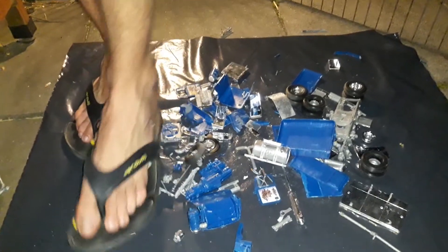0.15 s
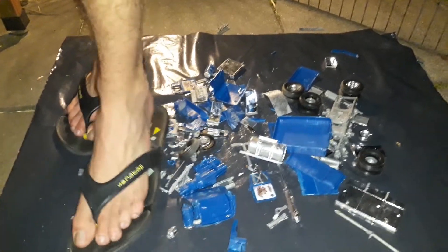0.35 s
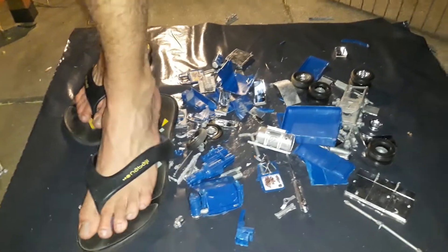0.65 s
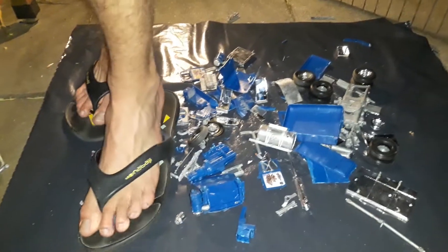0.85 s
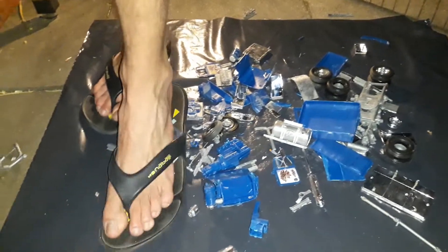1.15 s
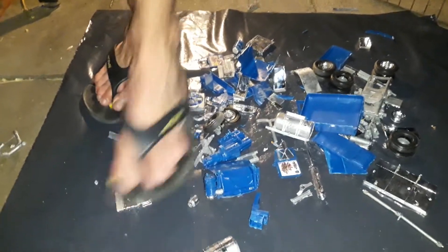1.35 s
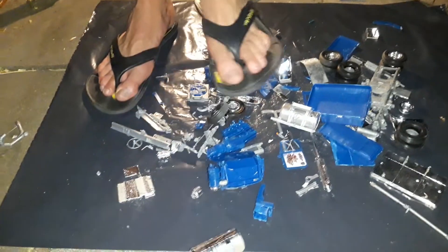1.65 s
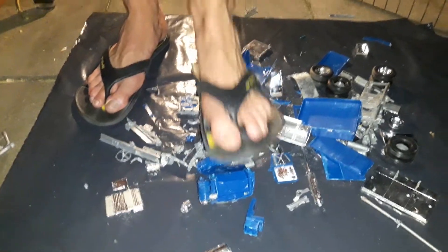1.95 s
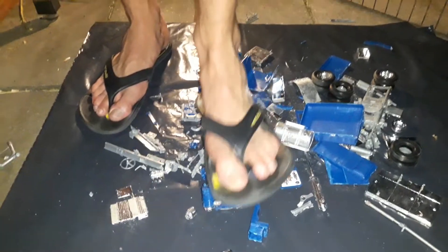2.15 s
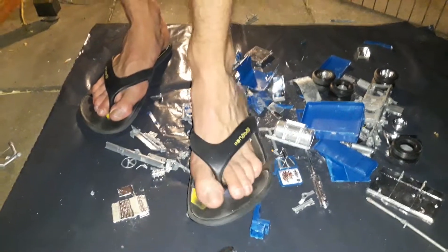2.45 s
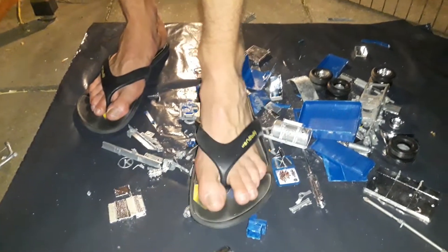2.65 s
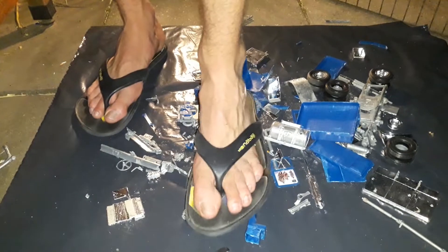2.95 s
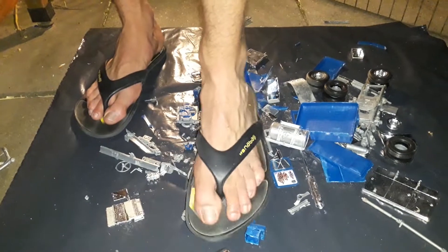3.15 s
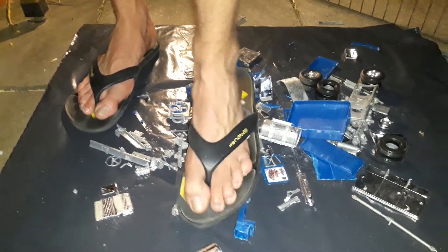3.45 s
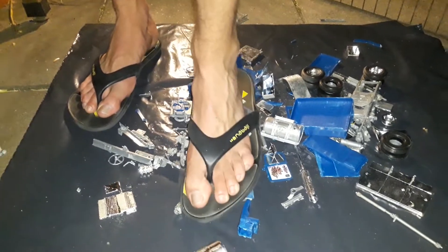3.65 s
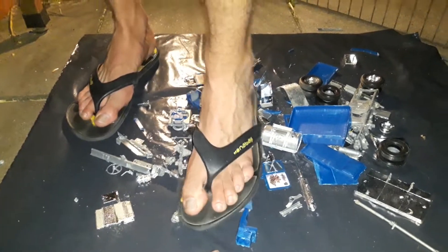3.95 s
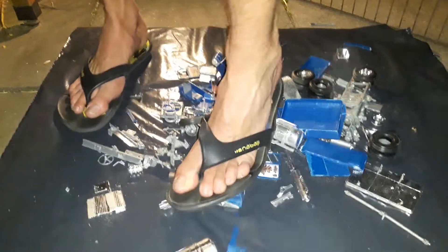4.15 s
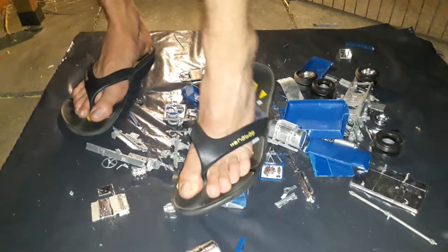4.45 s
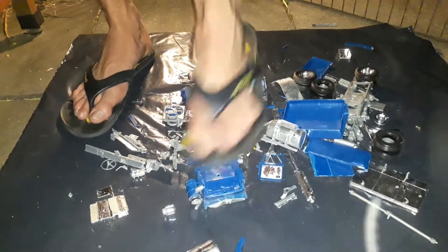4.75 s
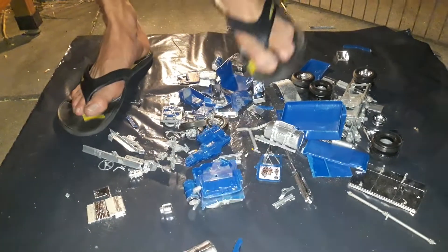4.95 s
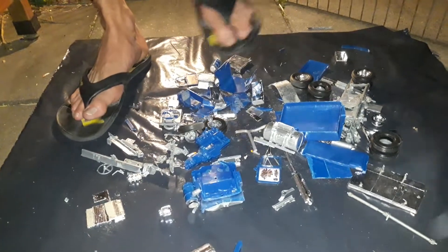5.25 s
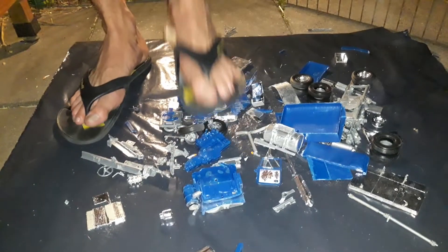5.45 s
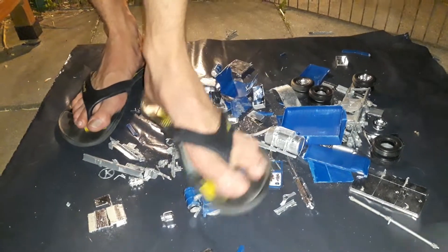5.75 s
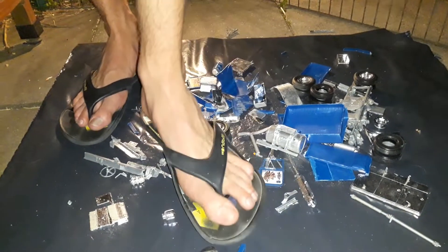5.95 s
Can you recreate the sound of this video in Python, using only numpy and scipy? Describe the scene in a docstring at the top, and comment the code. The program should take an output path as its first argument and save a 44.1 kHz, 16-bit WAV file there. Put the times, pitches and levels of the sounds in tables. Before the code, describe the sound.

At night outdoors, heard close to a sheet on paving. From 0 to 0.8 s, soft low bumps and small plastic ticks with faint scraping over a low rumble. At about 0.9 s a part gives way in a tight, loud, hollow crack with a dull rubber slap, echoing briefly off nearby walls. Near quiet follows until 2.3 s, when the sole drags bits, with light clicks. A snap at 2.7 and another at 3.0 lead to a dense volley of bright, brittle cracks from 3.2 to 3.45 s. Separate clicks follow, then hard crunches at 3.95 and 4.1 s with grinding grit. Between 4.2 and 4.7 s pieces tick, scrape and settle, with a small crack near 4.4. It is almost silent until soft bumps around 5.4; from 5.7 light taps and scraping build to a sharp bright clatter at 5.9 to 6.1 s, with a faint insect rasp behind.

```python
"""Outdoors at night, on a sheet laid over paving: a foot in a rubber sandal treads a plastic model kit to bits.
Parts snap in bursts of damped noise and ringing modes; loose bits tick as short clicks with a note.
Grains and uneven noise grind and drag under the sole, which slaps down; nearby walls throw the blows back.
Behind lie soft low sine bumps, and a rumble, a hiss and a faint bush cricket shaped from noise."""
import sys
import numpy as np
from scipy import signal
from scipy.io import wavfile

SR = 44100
rng = np.random.default_rng(int(sys.argv[2]) if len(sys.argv) > 2 else 0)


def generate_wav(signal):
    """Clip the signal to [-1, 1] and save it as 16-bit WAV at the path in sys.argv[1]."""
    frames = np.transpose(np.atleast_2d(signal))
    scaled = np.clip(frames, -1, 1) * 32767
    pcm = np.round(scaled).astype(np.int16)
    wavfile.write(sys.argv[1], SR, pcm)


N = 268569  # length in samples

SHARD_HZ = 4000  # pitch of a small shard, from which sizes are counted


def amp(db):
    """Decibels to gain."""
    return 10 ** (np.asarray(db) / 20)


def evened(x):
    """Scales to rms 1."""
    return x / np.sqrt(np.mean(x ** 2) + 1e-20)


def unit(x):
    """Scales to energy 1."""
    return x / (np.linalg.norm(x) + 1e-20)


def dying(t, t60):
    """Falls by 60 dB in t60 seconds."""
    return np.exp(-np.log(1000) * t / np.maximum(t60, 1e-3))


def read(points, hz):
    """Reads a table on a log-frequency axis."""
    f, value = np.transpose(points)
    return np.interp(np.log(hz + 1), np.log(f + 1), value)


def curve(rows):
    """Turns a table of (t/s, level/dB) into a gain for every sample."""
    return amp(np.interp(np.arange(N) / SR, *np.transpose(rows)))


def add(mix, s, sound):
    """Mixes a sound in at time s, cut off at the end of the mix."""
    part = mix[max(round(s * SR), 0):][:len(sound)]
    part += sound[:len(part)]


def band(x, lo_hz, hi_hz, order=3):
    """Causal band-pass."""
    edges = [lo_hz, min(hi_hz, SR / 2 - 1)]
    return signal.sosfilt(signal.butter(order, edges, "band", fs=SR, output="sos"), x)


def colour(x, points, size=4096):
    """Minimum-phase filter with the given spectrum, so that attacks stay sharp."""
    hz = abs(np.fft.fftfreq(size, 1 / SR))
    log_gain = np.log(amp(np.maximum(read(points, hz), -100)))
    taps = np.fft.ifft(np.exp(np.conj(signal.hilbert(log_gain)))).real
    return signal.oaconvolve(x, taps[:size // 2])[:len(x)]


def octaves(hz):
    """The size of a piece: octaves below the pitch of a small shard."""
    return np.log2(SHARD_HZ / hz)


def blend(noise, note, note_db):
    """Shares a blow's energy between its noise and its note."""
    mixed = noise + amp(note_db) * np.linalg.norm(noise) * note
    return mixed / np.hypot(1, amp(note_db))


def burst(t, t60, rise, hold=0.00082):
    """Noise for crowded, heavily damped modes: fed while the blow lasts (hold, s), then dying."""
    attack = 1 - np.exp(-t / rise)
    return rng.standard_normal(len(t)) * attack * dying(np.maximum(t - hold, 0), t60)


# Spectrum of struck plastic: f/Hz, level/dB (relative, per Hz)
PLASTIC_SPECTRUM = [(100, -19.5), (400, -13.5), (850, -4), (1250, -2.5), (1600, 4.5), (2000, 0.5),
                    (2800, 3.5), (4200, 5), (5300, -3.5), (7000, -14.5), (9000, -35), (11000, -28),
                    (15000, -18), (17000, -24)]


def plastic_burst(t, t60, rise):
    """A burst with the colour of struck plastic."""
    return colour(burst(t, t60, rise), PLASTIC_SPECTRUM)


def ring(t, hz, t60, spread, strike_db=3, strike_t60=.018, after_db=-35, linger=6.5, count=3):
    """Close modes, the main note of one piece: a hard first swing, the ring, a faint after-ring."""
    detune = 1 + spread * (np.linspace(-1, 1, count) + rng.uniform(-0.005, 0.14, count))
    # struck together, the modes start nearly in step
    start = rng.random() + 0.19 * rng.random((count, 1))
    cluster = np.sin(2 * np.pi * (hz * detune[:, None] * t + start))
    # the sole damps the first swing at once
    first_swing = amp(strike_db) * dying(t, strike_t60)
    after_ring = amp(after_db) * dying(t, t60 * linger)
    fall = first_swing + dying(t, t60) + after_ring
    return unit(band(cluster.sum(0) * fall, hz / 1.2, hz * 1.2, order=2))


def modes(t, table):
    """A set of modes struck together, each in its own phase."""
    total = np.zeros(len(t))
    for hz, db, t60 in table:
        total += amp(db) * np.sin(2 * np.pi * (hz * t + rng.random())) * dying(t, t60)
    return unit(band(total, 500, 5200))


# Swell of the rumble: t/s, level/dB (before the trim below)
RUMBLE_SWELL = [(0, -51), (0.95, -51.5), (1.4, -61.5), (1.98, -63.5), (2.45, -53), (3.25, -52),
                (3.65, -63.5), (4.05, -63.5), (4.65, -70), (5.18, -72), (5.85, -54.5), (6.09, -53)]
# Spectrum of the rumble: f/Hz, level/dB (relative, per Hz)
RUMBLE_SPECTRUM = [(20, -28.5), (50, -5), (85, 2), (150, 1.5), (230, -3.5), (330, -7), (450, -13.5),
                   (650, -23), (1000, -35), (2000, -50)]


def rumble(trim_db=2):
    """Low coloured noise that swells and sinks."""
    noise = evened(colour(rng.standard_normal(N), RUMBLE_SPECTRUM))
    return amp(trim_db) * curve(RUMBLE_SWELL) * noise


# Spectrum of the hiss: f/Hz, level/dB (relative, per Hz)
HISS_SPECTRUM = [(300, -6), (1000, -9), (3000, -5), (8000, -18), (11000, -10), (16000, -7.5)]


def hiss(rms_db=-85):
    """Faint, steady coloured noise."""
    return amp(rms_db) * evened(colour(rng.standard_normal(N), HISS_SPECTRUM))


# Loudness of the far-off bush cricket: t/s, level/dB
CRICKET_LEVEL = [(0, -100), (2.2, -100.5), (2.8, -80), (3.8, -82), (4.9, -96.5), (5.9, -69.5),
                 (6.09, -70.5)]
# Resonances of its wings: f/Hz, width/Hz, level/dB (relative)
WING_RESONANCES = [(10150, 770, -2), (12200, 600, -9)]


def cricket(cycles_per_s=19.5, back_stroke=.36, stroke_width=.09, blur=.35):
    """The wings rasp twice in every cycle, closing and opening; distance blurs the strokes."""
    cycle = np.arange(N) / SR * cycles_per_s
    strokes = np.zeros(N)
    for at in (0, back_stroke):  # in parts of a cycle, as is the stroke width
        offset = (cycle - at + .5) % 1 - .5
        strokes += np.exp(-(offset / stroke_width) ** 2)
    rasp = (blur + strokes) * rng.standard_normal(N)
    song = np.zeros(N)
    for hz, width, db in WING_RESONANCES:
        song += amp(db) * evened(band(rasp, hz - width / 2, hz + width / 2, order=2))
    return curve(CRICKET_LEVEL) * evened(song)


# Soft low bumps: t/s (near the middle of the swell), level/dB (peak)
BUMP_EVENTS = [(0.09, -37), (0.248, -34.5), (0.422, -34.5), (0.579, -36.5), (0.716, -39.5), (0.843, -35.5),
               (1.16, -44.5), (3.56, -45), (3.731, -48.5), (4.864, -55), (5.131, -54.5), (5.275, -52),
               (5.427, -43.5), (5.587, -44), (5.716, -39)]


def bumps(hz=113.1, length=0.051, lead=0.014):
    """Soft swells of a few low cycles, all of one pitch; length and lead in seconds."""
    out, t = np.zeros(N), np.arange(0, length, 1 / SR)
    for s, db in BUMP_EVENTS:
        swell = np.hanning(len(t)) * np.sin(2 * np.pi * (hz * t + rng.random()))
        add(out, s - lead, amp(db) * swell)
    return out


# Single echoes off nearby surfaces: delay t/s, level/dB
SINGLE_ECHOES = [(.0047, -22.5), (.0093, -24.5), (0.0108, -28.5), (0.0201, -25.5), (.0205, -30.5),
                 (0.03, -31)]
# Reverberation of the walls: f/Hz, t60/s
WALL_DECAY = [(150, 0.06), (600, 0.098), (1600, 0.21), (4000, 0.13), (8000, 0.14), (15000, .11)]


def walls(x, near_db=-10, far_db=-34, far_t60=0.23, delay=0.0059):
    """Single echoes, a short dense tail, and a faint duller one from the yard beyond."""
    hz, times, z = signal.stft(rng.standard_normal(SR), SR, nperseg=256)
    fading = z * dying(times, read(WALL_DECAY, hz)[:, None])  # each frequency at its own rate
    near = signal.istft(fading, SR, nperseg=256)[1][:SR]
    far_noise = rng.standard_normal(SR) * dying(np.arange(SR) / SR, far_t60)
    far = band(unit(far_noise), 460, 4500, order=2)
    response = np.zeros(SR)
    add(response, delay, amp(near_db) * unit(near) + amp(far_db) * far)
    for s, db in SINGLE_ECHOES:
        add(response, s, amp([db]))
    return signal.fftconvolve(x, response)[:N]


def aftermath(share_db, t60):
    """A gain that jumps at every break, in step with its strength, and dies away."""
    power, t = np.zeros(N), np.arange(SR // 2) / SR
    for s, db, *_ in BREAKS:
        add(power, s, (amp(db + share_db) * dying(t, t60)) ** 2)
    return np.sqrt(power)


# How hard the sole works the bits, over three treads: t/s, grinding level/dB
SOLE_PRESSURE = [(0, -65.5), (0.5, -76), (1.0, -69), (1.4, -94), (2.1, -88), (2.42, -66.5), (2.68, -69),
                 (2.98, -54.5), (3.17, -59), (3.42, -57.5), (3.62, -74.5), (3.9, -67), (4.15, -62),
                 (4.62, -70.5), (4.78, -80), (5.22, -86.5), (5.75, -69.5), (6.09, -61)]
# Spectrum of the grinding fragments: f/Hz, level/dB (relative, per Hz)
GRIT_SPECTRUM = [(900, -30.5), (1800, -9), (2500, 6), (4300, 4.5), (6500, -8), (8500, -25.5),
                 (10300, -20.5), (12500, -21.5), (15500, -18)]
# Spectrum of the sole scuffing the sheet: f/Hz, level/dB (relative, per Hz)
SCUFF_SPECTRUM = [(250, -15), (550, -0.5), (900, 3), (1700, -2), (2400, -13.5), (5000, -39)]
# After each break the splinters crumble and the sole sinks (dB re the break, t60 in s)
CRUMBLE_DB, CRUMBLE_T60_S = -50.5, 0.16
SINK_DB, SINK_T60_S = -62.5, 0.22


def grinding(slips_per_s=600, size_db=3.0, count=24):
    """Many tiny slips, each ringing one of the fragments, over the rub of sole and sheet."""
    smooth, note, note_t60 = .25, .8, .06  # gain of the rub, gain of the notes, their decay in s
    t, grains = np.arange(SR // 12) / SR, np.zeros(N)
    for hz in np.geomspace(2200, 6500, count):
        happens = rng.random(N) < slips_per_s / count / SR
        slips = happens * amp(size_db * np.minimum(rng.exponential(1, N), 3))
        fragment = unit(burst(t, 0.0053, rise=0.00035)) + note * ring(t, hz, note_t60, spread=0.022)
        grains += signal.oaconvolve(slips, fragment)[:N]
    rub = evened(grains) + smooth * rng.standard_normal(N)
    pressure = curve(SOLE_PRESSURE)
    grit = pressure + aftermath(CRUMBLE_DB, CRUMBLE_T60_S)
    scuff = pressure + aftermath(SINK_DB, SINK_T60_S)
    return grit * evened(colour(rub, GRIT_SPECTRUM)) + scuff * evened(colour(rub, SCUFF_SPECTRUM))


# The sole dragging bits over the sheet: t/s, length/s, level/dB, pitch f/Hz
DRAG_STROKES = [(0.016, 0.037, -60, 1660), (0.274, 0.12, -62, 2030), (0.278, 0.02, -61, 4170),
                (2.343, 0.074, -54.5, 838), (2.34, 0.04, -59.5, 4800), (2.389, 0.29, -66.5, 2350),
                (2.884, 0.23, -56, 2400), (4.32, 0.084, -50.5, 3590), (4.448, 0.061, -57, 3180),
                (4.59, 0.11, -56.5, 4300), (5.713, 0.041, -60.5, 1215), (5.701, 0.14, -58.5, 697),
                (5.891, 0.15, -57.5, 5370), (6.057, 0.03, -42.5, 5200)]
# Relative widths of the rasp and of the piece's own resonance; the latter's level re the rasp
RASP_WIDTH, DRAG_NOTE_WIDTH, DRAG_NOTE_DB = 0.32, .07, -5


def drags(slips_per_s=160, uneven_db=5):
    """Bits stick and slip under the rubber: a fuzzy tone that comes in uneven spurts."""
    out, t = np.zeros(N), np.arange(SR // 2) / SR
    for s, length, db, hz in DRAG_STROKES:
        stroke = signal.windows.tukey(int(np.clip(length, .01, .5) * SR), .6)
        hold = rng.standard_normal(SR // 100)  # one random strength per slip
        grip = amp(uneven_db * np.interp(t * slips_per_s, np.arange(len(hold)), hold))
        slips = grip * rng.standard_normal(len(t))
        rasp, note = (band(slips, hz / (1 + width), hz * (1 + width))[:len(stroke)]
                      for width in (RASP_WIDTH, DRAG_NOTE_WIDTH))
        tone = evened(blend(rasp, unit(note), DRAG_NOTE_DB))
        add(out, s, amp(db) * stroke * tone)
    return out


# Fainter random taps: rate, level re the grinding and its spread either way
STRAYS_PER_S, STRAY_DB, STRAY_SPREAD_DB = 12, 28.5, 2.5
# Their pitch range, fizz and note re the click
STRAY_LOW_HZ, STRAY_HIGH_HZ, STRAY_FIZZ_DB, STRAY_NOTE_DB = 1500, 4400, -12, 3.5


def strays(count=128):
    """Taps at random moments, as strong as the sole presses, as rows like those of LOOSE_TAPS."""
    wait, size, strength = rng.random((count, 3)).T
    times = np.cumsum(-np.log(1 - wait)) / STRAYS_PER_S
    pressure_db = np.interp(times, *np.transpose(SOLE_PRESSURE))
    levels = pressure_db + STRAY_DB + STRAY_SPREAD_DB * (2 * strength - 1)
    pitches = STRAY_LOW_HZ * (STRAY_HIGH_HZ / STRAY_LOW_HZ) ** size
    return [(s, db, STRAY_FIZZ_DB, hz, STRAY_NOTE_DB) for s, db, hz in zip(times, levels, pitches)]


# Loose bits tapping: t/s, energy level/dB, fizz level/dB re the click, note f/Hz, note level/dB re the click
LOOSE_TAPS = [(0.014, -29, -16, 3520, -3), (0.131, -28, -18, 4150, -3), (0.148, -33, -28, 1360, 8),
              (0.265, -29, -21, 2495, 9), (0.304, -29, -35, 1170, 6), (0.325, -19.5, -40, 1450, -19),
              (0.423, -31.5, -8, 2920, -3), (0.45, -28.5, -17, 2660, -2), (0.845, -36, -30, 3070, -13),
              (1.224, -45, -14, 1590, 1), (1.796, -56.5, -20, 1000, -4), (2.22, -36, -6, 3960, -6),
              (2.351, -25, -34, 1307, -26), (2.551, -26, -12, 4640, 0), (2.607, -22, -17, 4420, 14),
              (2.904, -21, -21, 2840, 4), (2.926, -19.5, -31, 2720, 9), (2.964, -19, -35, 2630, -12),
              (3.161, -24.5, -27, 2940, -4), (3.18, -25, -24, 4230, -0.5), (3.2197, -14, -38, 3080, -16),
              (3.233, -4, -21, 4160, -24), (3.484, -7, -21, 3130, -4), (3.5034, -13.5, -11, 4560, -7),
              (3.696, -12.5, -40, 2502, 1), (3.7029, -20, -15.5, 1184, -8.5), (3.743, -15.5, -18, 4310, 5),
              (4.017, -13, -17, 1620, -4), (4.198, -17.5, -45, 2570, 22), (4.2345, -17, -37, 2600, 18),
              (4.3145, -26.5, -35, 3160, -10), (4.4465, -13, -13, 4670, -4), (4.498, -11.5, -2, 2720, -5),
              (4.5454, -24, -28, 1690, 1), (4.5714, -19, -13, 1507, -1.5), (4.6282, -26.5, -9, 1580, -6),
              (4.647, -30.5, -27, 1385, 17), (4.668, -28, -16, 2390, 2), (4.705, -31, -27, 1560, -1),
              (4.808, -40.5, -17, 2420, -3), (5.474, -35.5, -21, 2650, -3),
              (5.724, -31.5, -16.5, 1209, -10), (5.8253, -26.5, -8.5, 2450, -10),
              (5.9152, -20.5, -29, 4260, -1.5), (5.9365, -10, -37, 2830, -5.5), (5.961, -22, -34, 2760, -4),
              (5.985, -15.5, -17.5, 4190, 4), (6.002, -22, -22, 4100, -9), (6.031, -16, -11, 4580, 3),
              (6.061, -4, -9, 4110, 7), (6.078, -14, -25, 4650, 2)]
# Spectrum of a tick's bright edge: f/Hz, level/dB (relative, per Hz)
TICK_FIZZ_SPECTRUM = [(3000, -19), (5500, 4.5), (6800, 7.5), (9000, -15), (12000, 0.5), (16000, -2)]
# Larger bits knock harder on the sheet (dB re the click)
KNOCK_DB, KNOCK_DB_PER_OCTAVE = -15.5, 11


def ticks(t60=0.053, note_t60=0.081, fizz_t60=0.0047, rise=0.0002):
    """A loose bit taps its neighbours: a short click, its own note and a knock on the sheet."""
    out, t = np.zeros(N), np.arange(SR // 6) / SR
    for s, db, fizz_db, hz, note_db in LOOSE_TAPS + strays():
        click = unit(band(plastic_burst(t, t60, rise), 1900, 6000, order=2))
        knock = unit(band(burst(t, t60, rise), 620, 2200))
        fizz = unit(colour(burst(t, fizz_t60, rise), TICK_FIZZ_SPECTRUM))
        knock_db = KNOCK_DB + KNOCK_DB_PER_OCTAVE * octaves(hz)
        tap = blend(click + amp(knock_db) * knock, ring(t, hz, note_t60, spread=0.051), note_db)
        add(out, s, amp(db) * (tap + amp(fizz_db) * fizz))
    return out


# The sole slapping down when a part gives way: t/s, level/dB (before the trim below)
SOLE_SLAPS = [(0.945, -15.5), (3.281, -43.5), (4.102, -30.5)]
# Low modes of the sandal: f/Hz, level/dB (relative), t60/s
SOLE_MODES = [(106.45, -2, 0.053), (182.4, 3.5, 0.11)]


def slaps(trim_db=21, t60=0.2, note_db=-2):
    """Rubber meets the paving with a dull, short push and a couple of low notes."""
    out, t = np.zeros(N), np.arange(SR // 4) / SR
    for s, db in SOLE_SLAPS:
        push = unit(band(burst(t, t60, rise=.002), 80, 700))
        notes = sum(amp(level) * np.sin(2 * np.pi * hz * t) * dying(t, decay)
                    for hz, level, decay in SOLE_MODES)
        slap = blend(push, unit(band(notes, 76, 700, order=2)), note_db)
        add(out, s, amp(db + trim_db) * slap)
    return out


# Parts breaking: t/s, energy level/dB of the shards, hollow body level/dB re the shards,
# fracture fizz level/dB re the shards, pitch f/Hz of the piece left ringing, its level/dB re the crack
BREAKS = [(0.8839, 2, -0.5, -21.5, 2450, -3), (0.922, -1.5, -18, -15, 3070, -4.5),
          (0.946, 7, 4.5, -17, 1590, -9.5), (0.9493, 9, -2, -21.5, 1646, 0),
          (0.963, 7, 0, -31.5, 1660, 7.5), (2.7161, -11.5, -4, -2.5, 4130, -3),
          (2.7389, 6.5, -10.5, -13, 4314, -3.5), (3.0379, 6.5, -18, -8, 4280, -3.5),
          (3.2491, 11.5, -11, -20.5, 4160, 4.5), (3.254, 14, -16.5, -20, 3930, -3.5),
          (3.266, 8.5, -13, -18, 4350, -4.5), (3.271, 8, -7.5, -8, 3860, -6),
          (3.283, 11.5, -6, -15, 3800, -3), (3.291, 1, -15.5, -23.5, 3220, -3.5),
          (3.302, -0.5, -19.5, -17.5, 4040, -3), (3.314, 12, -32.5, -7, 4010, 3),
          (3.3258, 9.5, -13, -11, 3810, -1.5), (3.358, 0, -20.5, -28.5, 3987, -3.5),
          (3.388, 2, -7.5, -2, 4544, -6.5), (3.4075, 14, -18, -18.5, 4316, -2),
          (3.411, 10, -19.5, -26, 2482, 7), (3.424, 11.5, -14, -18, 2670, -4),
          (3.9234, -7, -16.5, -4, 4000, -6), (3.9503, 8, -32, -20.5, 3850, 2.5),
          (3.957, 12.5, -34, -17.5, 2960, 2), (3.959, 8, -23, -14.5, 1676, 0),
          (4.0404, -5, -11, -13, 3750, -5.5), (4.063, 8.5, -15, -23, 3670, -2.5),
          (4.092, 4.5, -10.5, -7, 2950, -10), (4.096, 8, -8, -20.5, 4360, -4.5),
          (4.1045, 15, -20.5, -20.5, 4320, -5.5), (4.1109, 3.5, -21, -31.5, 1500, 2.5),
          (4.367, -0.5, -31, -26, 1522, 1)]
# Edges of the body, panel, shard and fizz ranges: f/Hz
RANGE_EDGES = [90, 1100, 2100, 8000, 17500]
# Hollow shell of the model, rung by every break: f/Hz, level/dB (relative), t60/s
SHELL_MODES = [(690, -7, .06), (863, -1.5, 0.096), (1042, 0, .07), (1275, -3, .07), (1520, 0, 0.12),
               (1643, 1.5, .1)]
# Smaller parts lying around, rung by every break: f/Hz, level/dB (relative), t60/s
PARTS_MODES = [(2137, -5, .06), (2470, -1, .07), (2710, -2.5, .07), (3050, -0.5, .06), (3440, -4.5, .07),
               (3933, 0.5, .06), (4620, -4, .06)]
SHELL_DB, PARTS_DB = -3, -9  # re the hollow body, re the shards
# A ringing piece lasts longer the larger it is
RING_T60_S, RING_T60_S_PER_OCTAVE = 0.03, 0.029
# Broad panels shake with the hollow body, and more so in large pieces (re the shards)
PANEL_DB, PANEL_PER_BODY_DB, PANEL_DB_PER_OCTAVE = -11.5, .5, 7.5


def cracks(t60=0.013, body_t60=0.042, fizz_t60=0.02, rise=0.0012):
    """Each break shakes the whole part for a few ms and leaves one piece ringing."""
    out, t = np.zeros(N), np.arange(SR // 2) / SR
    decays = [body_t60, t60, t60, fizz_t60]
    for s, db, body_db, fizz_db, hz, ring_db in BREAKS:
        size = octaves(hz)
        panel_db = PANEL_DB + PANEL_PER_BODY_DB * body_db + PANEL_DB_PER_OCTAVE * size
        gains = amp([body_db, panel_db, 0, fizz_db])
        snap = np.zeros(len(t))
        for gain, decay, lo, hi in zip(gains, decays, RANGE_EDGES, RANGE_EDGES[1:]):
            shake = plastic_burst(t[:SR // 20], decay, rise)
            add(snap, 0, gain * unit(band(shake, lo, hi, order=4)))
        snap += amp(body_db + SHELL_DB) * modes(t, SHELL_MODES)
        snap += amp(PARTS_DB) * modes(t, PARTS_MODES)
        ring_t60 = RING_T60_S + RING_T60_S_PER_OCTAVE * size
        # pieces that ring long also ring purer
        spread = np.interp(ring_t60, [.04, .07], [.045, .02])
        add(out, s, amp(db) * blend(snap, ring(t, hz, ring_t60, spread), ring_db))
    return out


def scene():
    """Breaking and shifting plastic with its echoes, over the background."""
    background = rumble() + hiss() + cricket() + bumps()
    rubbing = grinding() + drags()
    blows = ticks() + slaps() + cracks()
    return (background + rubbing + blows + walls(blows))[None]


def record(dry, edge_hz=16150):
    """The microphone drops the deepest bass, the loudest cracks are rounded off; then the band limit."""
    low_cut = signal.butter(2, 48, "high", fs=SR, output="sos")
    heard = signal.sosfilt(low_cut, dry)
    rounded = heard / (1 + (heard / .95) ** 6) ** (1 / 6)
    band_limit = signal.firwin(255, edge_hz, window=("kaiser", 8), fs=SR)
    return signal.oaconvolve(rounded, band_limit[None], "same")


dry = scene()
out = record(dry)
generate_wav(out)
```